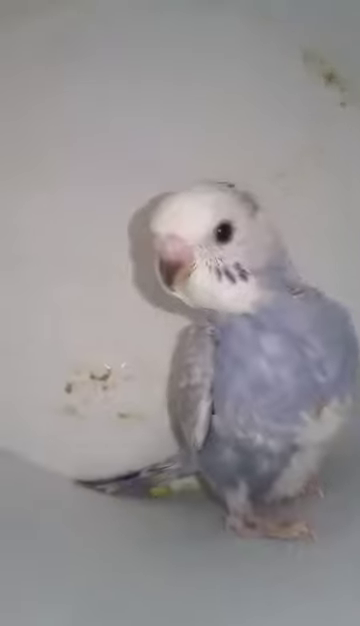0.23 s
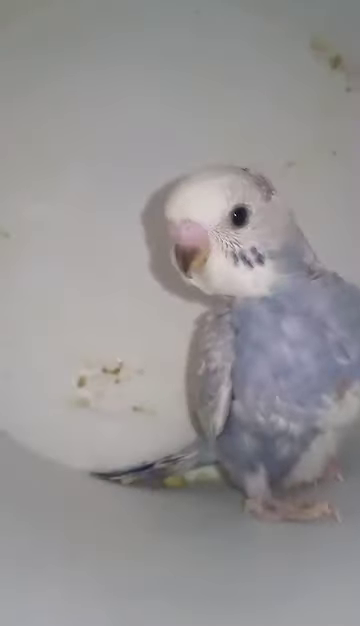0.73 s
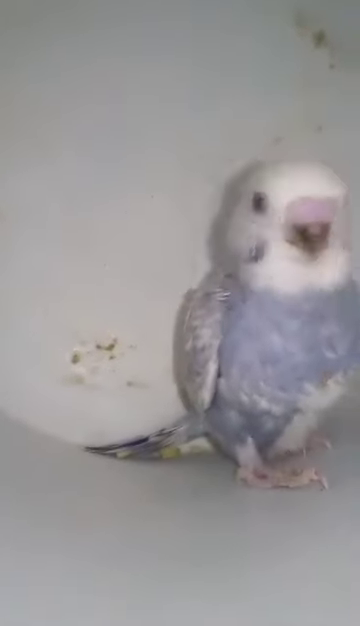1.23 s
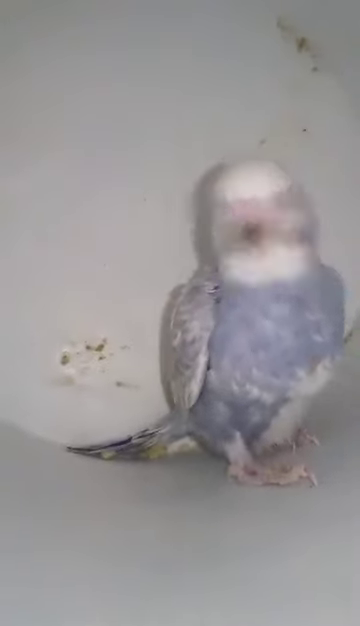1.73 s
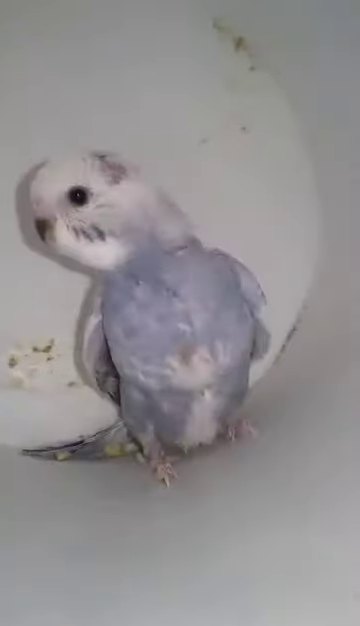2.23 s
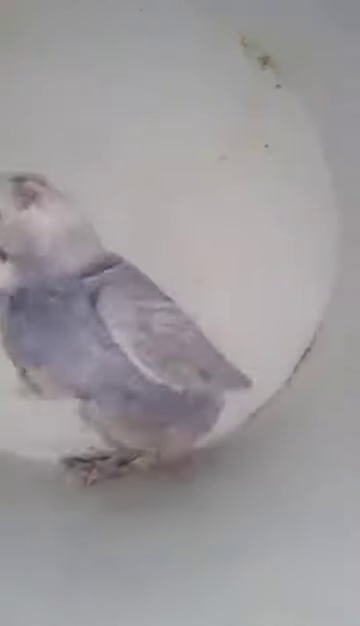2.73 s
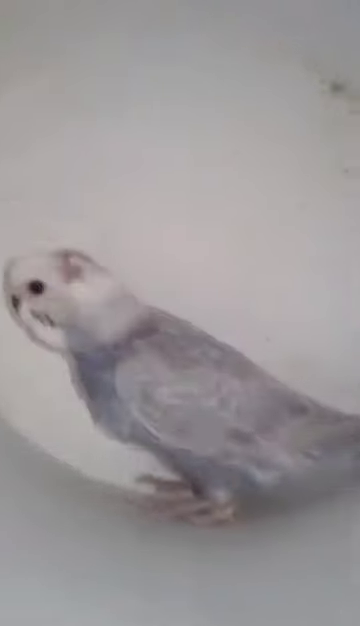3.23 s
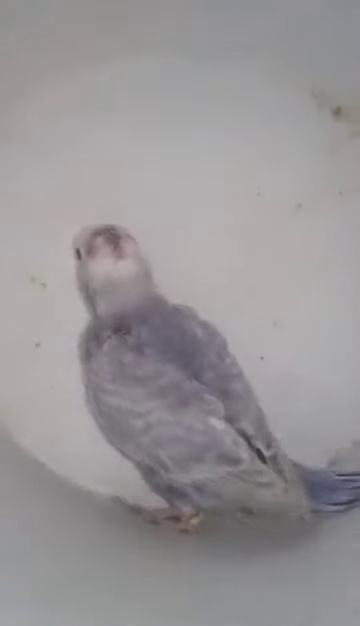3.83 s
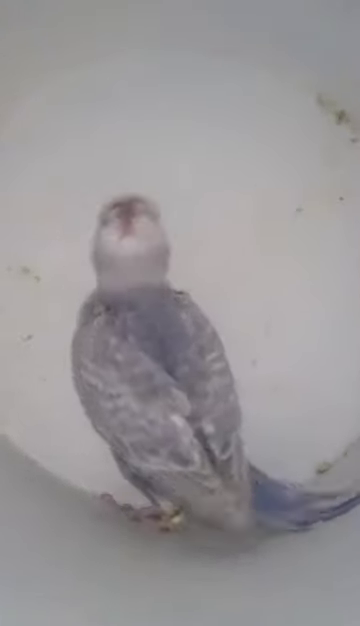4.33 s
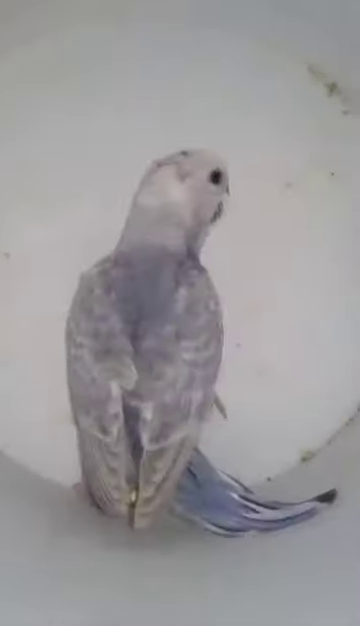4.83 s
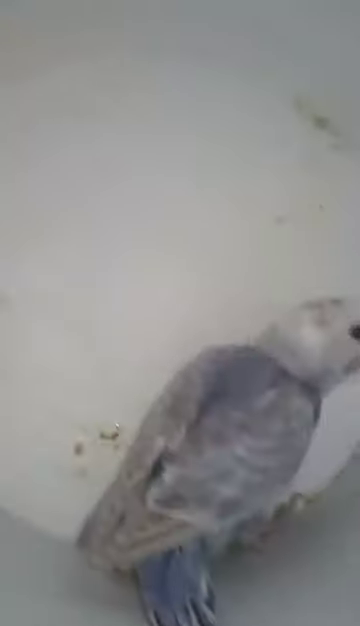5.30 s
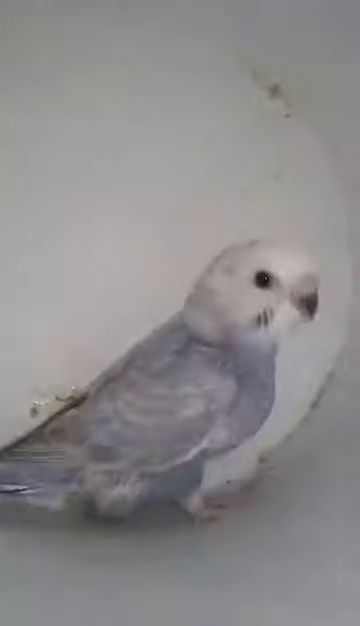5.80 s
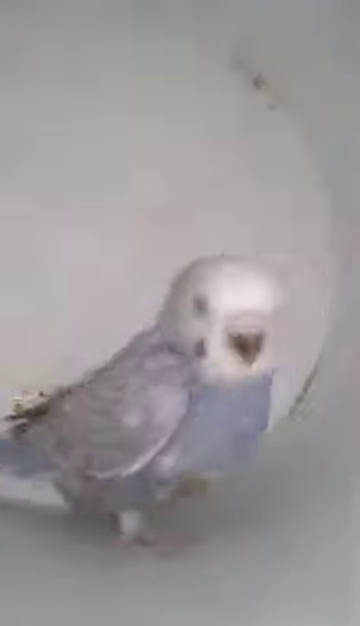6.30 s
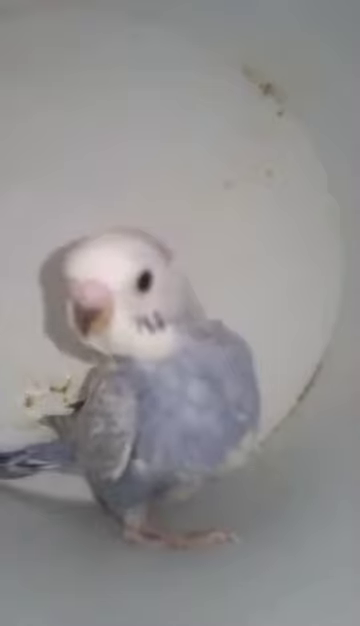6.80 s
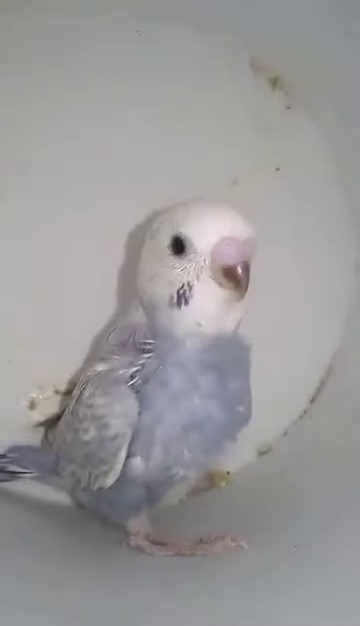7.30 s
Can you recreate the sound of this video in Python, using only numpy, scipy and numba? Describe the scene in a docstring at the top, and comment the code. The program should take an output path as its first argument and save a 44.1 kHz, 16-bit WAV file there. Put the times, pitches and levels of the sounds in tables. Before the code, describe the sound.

Inside a plastic tub, heard close through one small mono microphone. For the first second there is only faint air, a soft wavering far whistle around 0.2 to 0.5 s, breathy distant bird calls, clearest near 1.0 to 1.3 s, and a weak low hum that comes and goes. At 1.13 s a dull foot knock hits the tub, and at 1.5 s the young budgerigar lets out a quick double puff of hiss. From about 1.95 s a light, even chatter of puffs runs to 2.4 s, then grows into a strong raspy hiss by 2.8 s. Sharp claw clicks fall at 2.4, 3.0 and 3.6 s, with muted footfalls near 3.7, 4.3 and 5.1 s. The scratchy, bright hissing continues in irregular puffs and swells, several per second at around 4 s and sparser later, over low tub rumbles at 3.6, 5, 6.2 and 7 s. A last puff at 7.2 s leaves hiss running to the end.

```python
"""In a plastic tub a young budgerigar hisses and chatters; other birds call softly from far off. The hiss is
turbulent noise filtered as chest, throat and beak, broken into swells and short puffs. Feet strike the ringing
modes of the tub, claws click, and the tub rumbles as noise in its low modes. The far birds and a low hum and
thump are narrow bands of noise and a wavering tone. One small microphone hears it all, alike on both sides."""
import sys
import numpy as np
from scipy import signal
from scipy.fft import rfft, irfft
from scipy.io import wavfile
from numba import njit

SR = 44100
rng = np.random.default_rng(int(sys.argv[2]) if len(sys.argv) > 2 else 0)


def level_to_linear(level):
    """Convert decibel levels to linear amplitude factors, elementwise."""
    exponent = np.asarray(level, float) / 20
    return 10 ** exponent


def log_audio(samples):
    """Write samples as a 16-bit WAV file to the path given in sys.argv[1]."""
    # one column per channel
    frames = np.atleast_2d(samples).T
    # limit to full scale, then quantise
    limited = np.clip(frames, -1, 1)
    pcm = np.round(limited * 32767).astype(np.int16)
    wavfile.write(sys.argv[1], SR, pcm)


N = 332955  # samples


def rms_one(x):
    """Scales a signal to an rms of 1."""
    return x / np.sqrt(np.mean(x ** 2) + 1e-20)


def in_time(rows):
    """Draws straight lines through the columns of a table whose first column is seconds."""
    s, *columns = np.transpose(rows)
    return [np.interp(np.arange(N) / SR, s, c) for c in columns]


def drift(rate_hz):
    """Slow chance: noise at every 40th sample through a double one-pole low-pass; spread 1."""
    r = np.exp(-80 * np.pi * rate_hz / SR)
    white = rng.standard_normal(N // 40 + 2002)
    slow = signal.lfilter([1], [1, -2 * r, r * r], white)[2000:]
    return np.interp(np.arange(N) / 40, np.arange(len(slow)), rms_one(slow))


def colour(x, points):
    """Shapes noise to a (Hz, dB) spectrum, at an rms of 1."""
    hz = np.fft.rfftfreq(len(x), 1 / SR) + 1
    hz_at, db_at = np.transpose(points)
    gain_db = np.interp(np.log(hz), np.log(hz_at), db_at)
    return rms_one(irfft(rfft(x) * level_to_linear(gain_db), len(x)))


@njit
def resonate(x, hz, width_hz, rate):
    """Two-pole resonance whose centre may move; gain 1 on top."""
    y, r = np.zeros(len(x)), np.exp(-np.pi * width_hz / rate)
    for i in range(2, len(x)):
        driven = (1 - r * r) / 2 * (x[i] - x[i - 2])
        y[i] = driven + 2 * r * np.cos(2 * np.pi * hz[i] / rate) * y[i - 1] - r * r * y[i - 2]
    return y


def peak(x, hz, width_hz):
    """Passes a signal through one resonance, at least 5 Hz wide."""
    return resonate(x, hz + np.zeros(len(x)), float(max(width_hz, 5)), float(SR))


def twice_peaked(x, hz, width_hz):
    """Two resonances on one centre, the second twice as wide, for steeper sides."""
    return peak(peak(x, hz, width_hz), hz, 2 * width_hz)


def ring(clicks, hz, t60):
    """A unit click sets a sine of height 1 ringing, 60 dB down after t60 seconds."""
    r, w = level_to_linear(-60 / (t60 * SR)), 2 * np.pi * hz / SR
    return signal.lfilter([0, np.sin(w)], [1, -2 * r * np.cos(w), r * r], clicks + 1e-18)


# Colour of the bird's air. Each row: frequency in Hz, relative spectrum level in dB.
AIR_COLOUR = [(500, -38), (720, -11.5), (1010, -10.5), (1470, -5.5), (1740, -8), (3450, 2), (4830, 0.5),
              (6480, 7.5), (7780, -12.5), (9070, -7), (11000, -23.5), (14200, -32.5)]
# Steady effort of the breath. Each row: time in seconds, throat level in dB, beak over throat in dB.
BREATH_EFFORT = [(0.0, -45.5, -10), (0.21, -60.5, 0), (0.9, -54, -0.5), (1.3, -49, -8), (1.9, -49, -5.5),
                 (2.04, -42, -0.5), (2.48, -37.5, -1.5), (2.86, -32, 0.5), (3.15, -28.5, -2.5),
                 (3.36, -36, -0.5), (3.87, -28.5, -1), (4.5, -31, 0.5), (5.22, -37, -4), (5.7, -35, 2),
                 (6.03, -36.5, -4.5), (6.31, -34, -3), (6.64, -29, 1.5), (6.83, -31.5, -6), (7.0, -28, -5),
                 (7.55, -31.5, -0.5)]
HOLLOW_DB, HOLLOW_BELOW_DB = 3.5, -42  # spread of the hollows; throat level under which they open


def patchy_air():
    """Turbulence: narrow noise bands swell apart and flare into dying squeaks; a fast rasp shakes all.
    Returned whole, and with broad hollows that open while the effort is low."""
    patchy_db, rasp_db, rasp_hz = 2.5, 2.4, 200
    squeaks_per_s, squeak_db, squeak_s = 2.2, 7, 0.045  # chances in each band; decay time constant
    weak = np.clip((HOLLOW_BELOW_DB - in_time(BREATH_EFFORT)[0]) / 10, 0, 1)
    regions, white = np.zeros((20, N)), rng.standard_normal((2, N))
    edges_hz = np.linspace(22, 120, 141) ** 2
    coarse, fade = N // 40 + 1, np.exp(-40 / (squeak_s * SR))  # every 40th sample
    for k, (low, high) in enumerate(zip(edges_hz, edges_hz[1:])):
        band_filter = signal.butter(2, [low, high], "band", fs=SR, output="sos")
        band = signal.sosfilt(band_filter, white[k % 2])
        kicks = (rng.random(coarse) < squeaks_per_s * 40 / SR) * rng.random(coarse)
        flare = np.repeat(signal.lfilter([.2] * 5, [1, -fade], kicks), 40)[:N]
        # low bands and weak breath squeak less
        squeak = level_to_linear(squeak_db) * min(low / 2500, 1) * (1 - weak) * flare
        regions[k // 7] += band * level_to_linear(patchy_db * drift(6.0)) * (1 + squeak)
    hollowed = sum(region * level_to_linear(HOLLOW_DB * weak * drift(5.5)) for region in regions)
    rasp = level_to_linear(rasp_db * drift(rasp_hz))
    return [colour(x * rasp, AIR_COLOUR) for x in (regions.sum(0), hollowed)]


# Tub air ringing in the hiss. Each row: frequency in Hz, width in Hz, gain in dB.
TUB_AIR_TONES = [(870, 29, -2), (1020.4, 8.9, 9), (1473, 20, -4)]
CHEST_DB, CHEST_FOLLOWS = -46.5, 0.67  # at mean effort; share of the throat's swing
CATCH_DB, CATCH_S = -4, 0.04  # dip in dB just before each puff, overlapping dips adding; time constant of the approach


def hiss(air):
    """Breath noise in three bands: throat carries the effort, chest follows in part, beak adds opening."""
    throat_db, beak_over_db = in_time(BREATH_EFFORT)
    chest_db = CHEST_DB + CHEST_FOLLOWS * (throat_db - throat_db.mean())
    ringing = air + sum(level_to_linear(db) * peak(air, hz, width) for hz, width, db in TUB_AIR_TONES)
    parts = (ringing, [660, 2000], "band"), (air, [2000, 4500], "band"), (air, 4500, "high")
    chest, throat, beak = [
        rms_one(signal.sosfilt(signal.butter(4, hz, kind, fs=SR, output="sos"), x))
        for x, hz, kind in parts]
    starts = np.zeros(N)
    starts[[round(s * SR) for s, *_ in SINGLE_PUFFS + chatter()]] = 1
    # run backwards: throat and beak are held back just before each puff
    catch = signal.lfilter([1], [1, -np.exp(-1 / (CATCH_S * SR))], starts[::-1])[::-1]
    upper = throat + level_to_linear(beak_over_db) * beak
    return level_to_linear(chest_db) * chest + level_to_linear(throat_db + CATCH_DB * catch) * upper


# Low and upper modes of the tub. Each row: frequency in Hz, width of the first resonance in Hz,
# mean relative level in dB.
LOW_MODES = [(55.5, 59, 4), (90, 18, 4), (123, 69, 7), (161, 193, -1)]
UPPER_MODES = [(315, 48, 4.5), (338.4, 33, 8.5), (408, 420, 4)]
# The bird shifts its weight. Each row: start in seconds, length in seconds, low-mode level in dB,
# upper modes over low modes in dB.
WEIGHT_SHIFTS = [(1.13, 0.51, -72.5, 9), (2.378, 0.33, -64, 3.5), (3.538, 0.47, -49, -3),
                 (4.094, 0.95, -100, 36.5), (4.866, 0.99, -48, -7.5), (5.753, 0.45, -63, 0),
                 (6.14, 0.31, -47.5, -3.5), (6.775, 0.5, -48.5, -4.5), (7.233, 0.54, -63, 10.5)]
SHIFT_RISE_S, SHIFT_FALL_S = 0.14, 0.17
# low and upper modes at rest, at mean effort; share of the hiss's swing that shakes them
REST_DB, REST_FOLLOWS = (-64.5, -66.5), (0.0083, 0.22)


def rumble():
    """Lumpy noise in the lower modes of the tub, faint at rest and raised while the bird shifts."""
    out, t, effort_db = 0, np.arange(N) / SR, in_time(BREATH_EFFORT)[0]
    for upper, modes in enumerate((LOW_MODES, UPPER_MODES)):
        level = level_to_linear(REST_DB[upper] + REST_FOLLOWS[upper] * (effort_db - effort_db.mean()))
        for s, length_s, db, upper_db in WEIGHT_SHIFTS:
            ramps = np.minimum((t - s) / SHIFT_RISE_S, (s + length_s - t) / SHIFT_FALL_S)
            level = level + level_to_linear(db + upper * upper_db) * np.clip(ramps, 0, 1)
        white = rng.standard_normal(N)
        rings = sum(level_to_linear(db + 7.5 * np.tanh(drift(7.1))) * twice_peaked(white, hz, width)
                    for hz, width, db in modes)
        out = out + level * rms_one(rings)
    return out


def gliding_noise(rows):
    """Noise twice through a narrow, wavering, gliding resonance, swelling and fading more slowly."""
    out, white, bend = np.zeros(N), rng.standard_normal(N), 1 + 0.0082 * drift(12.0)
    width_share = 0.075  # first resonance, as share of the starting pitch
    for s, length_s, hz, last_hz, db in rows:
        i, n = round(s * SR), round(length_s * SR)
        centre_hz = np.linspace(hz, last_hz, n) * bend[i:i + n]
        tone = rms_one(twice_peaked(white[i:i + n], centre_hz, width_share * hz))
        out[i:i + n] += level_to_linear(db) * tone * np.sin(np.pi * np.sqrt(np.arange(n) / n))
    return out


# Breathy calls of far birds. Each row: start in seconds, length in seconds, first pitch in Hz,
# last pitch in Hz, level before the fades in dB.
DISTANT_CALLS = [(0.093, 0.12, 1700, 1590, -51.5), (0.18, 0.18, 3380, 3700, -59),
                 (0.227, 0.25, 5760, 5360, -50.5), (0.735, 0.18, 2630, 2520, -47.5),
                 (0.957, 0.11, 1650, 1960, -48), (1.029, 0.31, 2600, 2650, -41),
                 (1.045, 0.14, 3750, 3750, -48.5), (1.058, 0.19, 5170, 5140, -47.5),
                 (1.069, 0.13, 1500, 1590, -49.5), (1.075, 0.1, 3000, 2950, -40.5),
                 (1.216, 0.16, 2350, 1950, -48), (1.337, 0.26, 1870, 1830, -50)]


def far_calls():
    """Far birds call as narrow noise whose centre glides from one pitch to another."""
    return gliding_noise(DISTANT_CALLS)


# One far bird's whistle. Each row: time in seconds, pitch in Hz, level in dB.
FAR_WHISTLE = [(0.159, 1060, -39), (0.226, 1218, -49.5), (0.421, 1305, -48.5), (0.51, 1157, -39)]


def whistle():
    """A wavering gliding tone blurred by breath, with a breathy octave, fading in and out."""
    hz, db = in_time(FAR_WHISTLE)
    t = np.arange(N) / SR
    gate = np.clip(np.minimum(t - FAR_WHISTLE[0][0], FAR_WHISTLE[-1][0] - t) / 0.08, 0, 1)
    phase = 2 * np.pi * np.cumsum(hz + 13.8 * drift(14.5)) / SR
    note = np.sin(phase) * level_to_linear(2.0 * drift(29))
    breath = rms_one(twice_peaked(rng.standard_normal(N), hz, 90))
    octave = rms_one(peak(rng.standard_normal(N), 2 * hz, 160))
    return gate * level_to_linear(db) * (note + level_to_linear(-7) * breath + level_to_linear(-6.5) * octave)


# A low hum that comes and goes, and one short low thump. Each row: start in seconds, length in seconds, pitch
# in Hz, # level before the fades in dB.
LOW_HUM = [(0.302, 0.21, 90, -48), (0.855, 0.49, 90.6, -49), (1.923, 0.068, 62, -42), (2.45, 0.27, 90, -54)]


def hum():
    """Narrow low noise around a wavering but level pitch."""
    return gliding_noise([(s, length_s, hz, hz, db) for s, length_s, hz, db in LOW_HUM])


# Single puffs of air. Each row: start in seconds, level of the whole puff in dB, resonance in Hz.
SINGLE_PUFFS = [(0.7194, -33.5, 8580), (1.361, -30, 5730), (1.499, -17, 5270), (1.525, -13, 5750),
                (1.904, -18, 6700), (2.576, -13.5, 4260), (2.636, -17.5, 6280), (2.6963, -17.5, 6550),
                (2.782, -8, 5250), (3.057, -14.5, 4570), (3.171, -14, 3330), (3.643, -14.5, 5820),
                (3.719, -11.5, 5700), (3.83, -12, 6530), (3.888, -13.5, 6000), (4.057, -12.5, 4240),
                (4.113, -10.5, 5180), (4.234, -9, 5580), (4.3394, -12.5, 5760), (4.413, -10, 5270),
                (4.5206, -10.5, 6580), (4.651, -19, 5400), (4.88, -13, 6500), (4.998, -14, 5670),
                (5.233, -13.5, 5640), (5.326, -15, 5980), (5.475, -14.5, 6820), (5.585, -10.5, 5490),
                (5.73, -18, 5900), (5.796, -19, 4330), (5.835, -15.5, 6600), (6.072, -12, 6550),
                (6.342, -17, 5760), (6.4155, -14, 5700), (6.549, -10, 5630), (6.816, -11.5, 5620),
                (7.22, -10.5, 5860)]
PUFF_RISE_S, PUFF_T60_S = 0.006, 0.43  # time constant; time to fall 60 dB
PUFF_TONE_DB, PUFF_AIR_DB = -16.5, -16.5  # against the puff's level
PUFF_LOWER_DB, PUFF_UPPER_DB = -9.5, -21.5  # partials at half and one and a half times the pitch
PUFF_WIDTH_HZ, PUFF_BEND_SHARE = 380, 0.0046  # main partial, first resonance; upward bend


def puffs(air):
    """Each puff opens fast and dies away: a noisy whistle bending up, two side partials and plain air."""
    out, t = np.zeros(N), np.arange(SR // 2) / SR
    shape = (1 - np.exp(-t / PUFF_RISE_S)) * level_to_linear(-60 * t / PUFF_T60_S)
    bend = 1 + PUFF_BEND_SHARE * (.5 - np.exp(-t / 0.04))
    for s, db, hz in SINGLE_PUFFS + chatter():
        i = round(s * SR)
        part = air[i:i + len(t)]
        tone = 0
        for order, partial_db in ((1, PUFF_LOWER_DB), (2, 0), (3, PUFF_UPPER_DB)):
            centre_hz = order * hz / 2 * bend[:len(part)]
            partial = twice_peaked(part, centre_hz, order * PUFF_WIDTH_HZ / 2)
            tone = tone + level_to_linear(partial_db) * rms_one(partial)
        puff = level_to_linear(PUFF_TONE_DB) * tone + level_to_linear(PUFF_AIR_DB) * part
        out[i:i + len(t)] += level_to_linear(db) * shape[:len(part)] * puff
    return out


# Feet on the tub. Each row: time in seconds, strength of the blow in dB, boom share in dB.
FOOTFALLS = [(1.1322, -15, -8), (1.936, -38.5, 5.5), (2.84, -43.5, -34), (2.982, -43, -25),
             (3.198, -35.5, -1), (3.736, -28, -8), (4.327, -27, -11), (5.072, -29.5, -67)]
# Ringing modes of the tub. Each row: frequency in Hz, relative level in dB, 60 dB decay in seconds.
TUB_MODES = [(128, -8, 0.09), (196, -12, 0.14), (240, -12, 0.12), (352, -6, 0.13), (430, -5, 0.05),
             (480, -11, 0.05), (800, -12, 0.04), (1060, -18, 0.037)]
BOOM_HZ, TUB_BAND_HZ = 170, (75, 520)  # modes below it boom; pass band of the knocks


def knocks():
    """Every footfall strikes all tub modes; its boom share sets the low mode against the rest."""
    s, db, boom_db = np.transpose(FOOTFALLS)
    out, scatter_db = np.zeros(N), 2.0 * rng.standard_normal((len(s), len(TUB_MODES)))
    rest_db = 10 * np.log10(np.clip(1 - level_to_linear(2 * boom_db), .02, 1))
    for k, (hz, mode_db, t60) in enumerate(TUB_MODES):
        blows = np.zeros(N)
        share_db = boom_db + 10 if hz < BOOM_HZ else rest_db
        blows[(s * SR).astype(int)] = level_to_linear(db + mode_db + share_db + scatter_db[:, k])
        out += ring(blows, hz, t60)
    # soft feet, and a small tub radiates no deep bass
    return signal.sosfilt(signal.butter(2, TUB_BAND_HZ, "band", fs=SR, output="sos"), out)


# Swells of breath. Each row: time of the top in seconds, level in dB, centre in Hz.
BREATH_SWELLS = [(1.557, -31, 4770), (2.86, -31, 5900), (3.17, -34.5, 2940), (5.61, -56, 4650),
                 (5.862, -27, 6350), (6.124, -28.5, 7100), (6.62, -32.5, 5330)]
SWELL_RISE_DB_PER_S, SWELL_FALL_DB_PER_S = 329, 151
SWELL_WIDTH, SWELL_AIR_DB = 0.39, 2.5  # first resonance as share of the centre; plain air over tone


def swells(air):
    """A swell climbs to its top and sinks more slowly: air in a broad resonance plus plain air."""
    out, t = np.zeros(N), np.arange(-SR // 4, SR // 2) / SR
    shape = level_to_linear(np.minimum(SWELL_RISE_DB_PER_S * t, -SWELL_FALL_DB_PER_S * t))
    for s, db, hz in BREATH_SWELLS:
        i = round((s + t[0]) * SR)
        part = air[i:i + len(t)]
        tone = rms_one(twice_peaked(part, hz, SWELL_WIDTH * hz))
        out[i:i + len(t)] += level_to_linear(db) * shape * (tone + level_to_linear(SWELL_AIR_DB) * part)
    return out


# Claw clicks. Each row: start in seconds, level in dB, ring in Hz, cycles to fall 60 dB.
CLAW_CLICKS = [(1.801, -28, 7000, 30), (1.815, -31, 2400, 20), (1.921, -21, 6800, 25),
               (2.425, -11.5, 3100, 20), (2.442, -22, 6600, 30), (2.542, -22, 4370, 25),
               (2.983, -9, 2290, 70), (3.6285, -15, 2800, 14)]
CRACK_DB = -32  # at the start, against the click's level


def claws():
    """A click is a short bright crack and a ringing note on its own pitch."""
    out, t = np.zeros(N), np.arange(SR // 20) / SR
    cracks = rng.standard_normal((len(CLAW_CLICKS), len(t)))
    for (s, db, hz, cycles), white in zip(CLAW_CLICKS, cracks):
        # a hard short click wakes a lower partial
        lower = min(18 / cycles, 1) * np.sin(2 * np.pi * 0.73 * hz * t)
        note = np.sin(2 * np.pi * hz * t) + lower
        note = note * level_to_linear(-60 * t * hz / cycles) * np.minimum(t * hz * 20 / cycles, 1)
        crack = rms_one(peak(colour(white, AIR_COLOUR), hz, hz))
        crack = crack * level_to_linear(CRACK_DB - 60 * t * hz / (2 * cycles)) * np.minimum(t * 1600, 1)
        out[round(s * SR):][:len(t)] += level_to_linear(db) * (note + crack)
    return out


# Runs of even chatter puffs. Each row: start in seconds, end in seconds, level of each puff in dB.
CHATTER_RUNS = [(1.96, 2.4, -19.5)]
CHATTER_GAP_S, CHATTER_HZ = 0.0661, (2680, 5170)


def chatter():
    """Rows like the single puffs, evenly spaced through each run, on chance pitches."""
    return [(s, db, rng.uniform(*CHATTER_HZ))
            for start, end, db in CHATTER_RUNS
            for s in np.arange(start, end, CHATTER_GAP_S)]


def scene():
    """The bird in its tub, the far birds and the hum, the same on both channels."""
    air, hollowed = patchy_air()
    # swells and puffs take the air shifted and reversed, so that they do not copy one another
    bird = hiss(hollowed) + swells(np.roll(air, SR)) + puffs(air[::-1].copy())
    tub = rumble() + knocks() + claws()
    mono = bird + tub + far_calls() + whistle() + hum()
    return np.array([mono, mono])


def low_pass(x):
    """Removes everything above the highest recorded frequency."""
    return signal.sosfilt(signal.butter(12, 14370, fs=SR, output="sos"), x)


def record(dry):
    """One small microphone on both channels: a gentle bass cut at 45 Hz and a steep top cut."""
    heard = signal.sosfilt(signal.butter(2, 45, "high", fs=SR, output="sos"), dry)
    heard = signal.sosfilt(signal.cheby2(16, 60, 14300, fs=SR, output="sos"), heard)
    return low_pass(heard)


dry = scene()
out = record(dry)
log_audio(out)
```